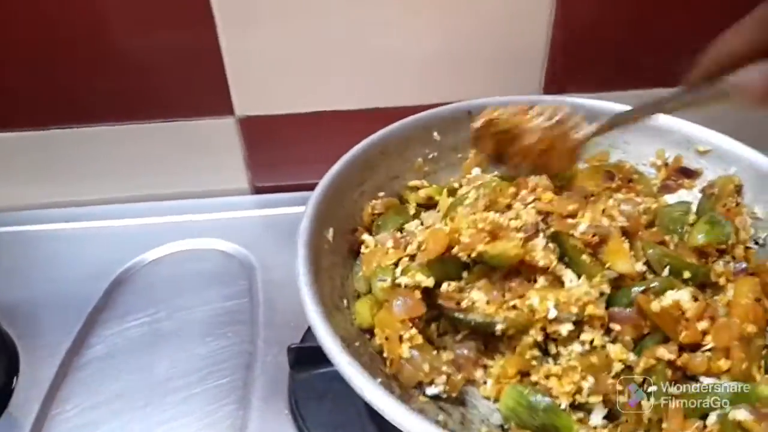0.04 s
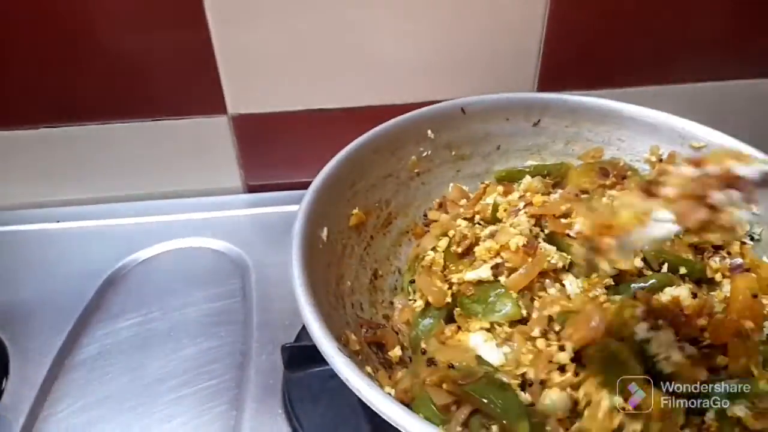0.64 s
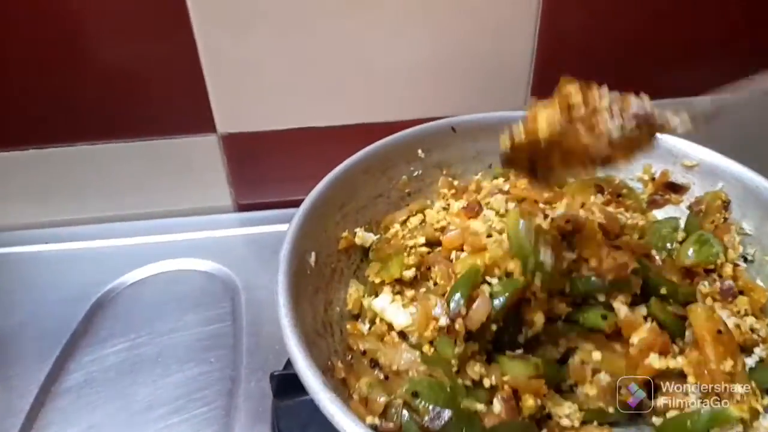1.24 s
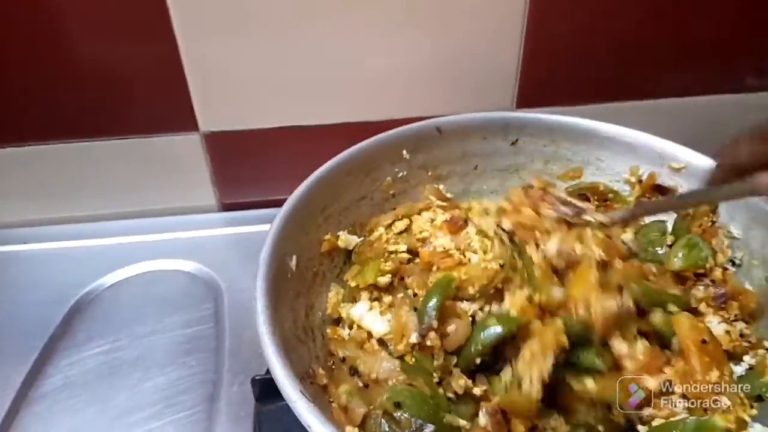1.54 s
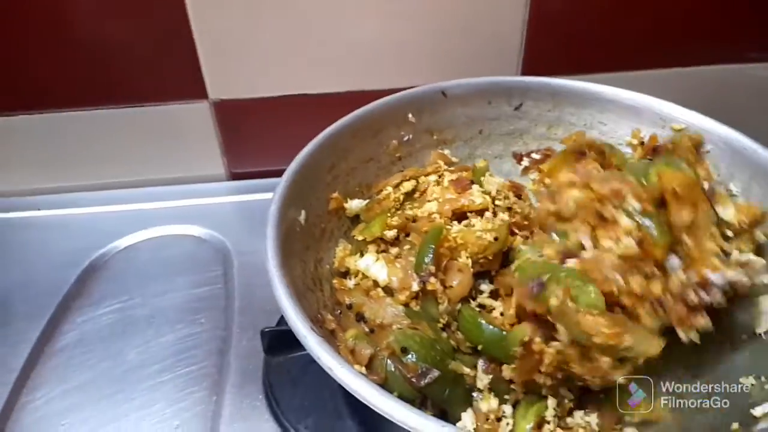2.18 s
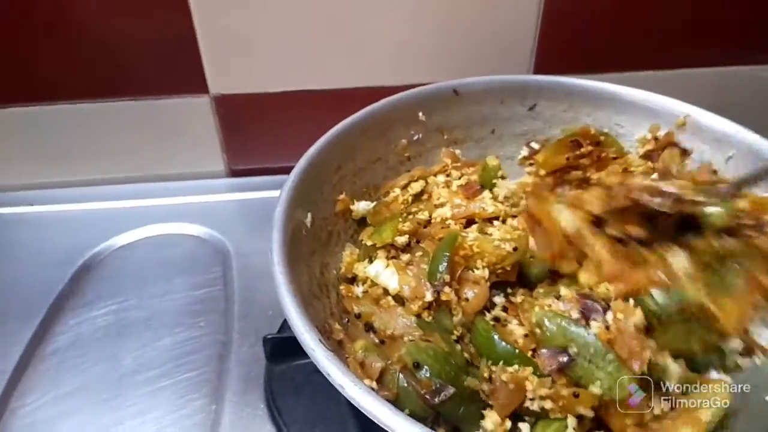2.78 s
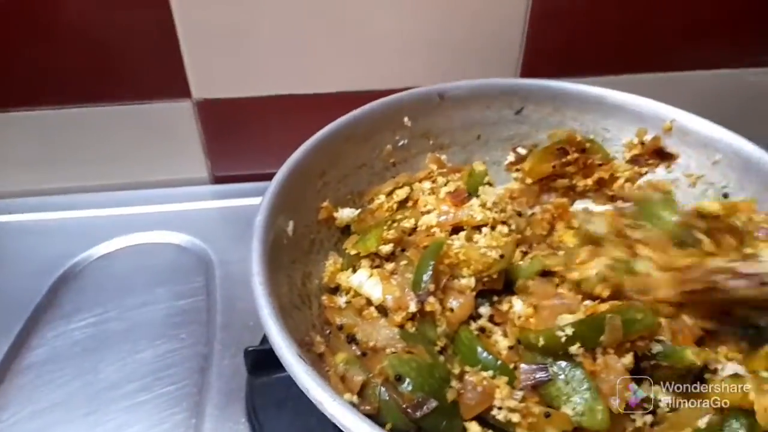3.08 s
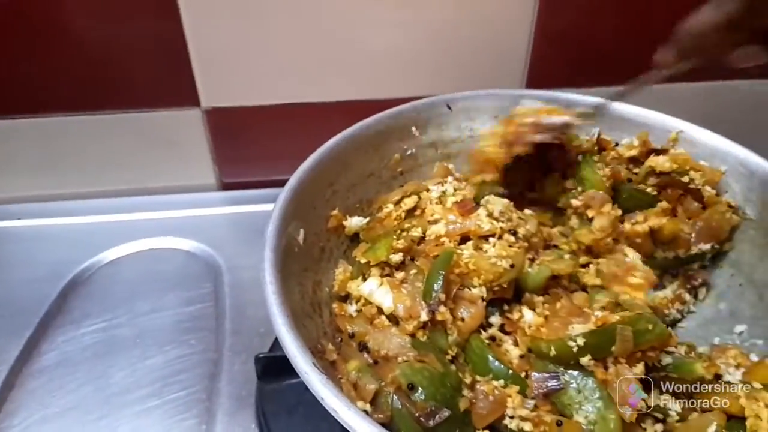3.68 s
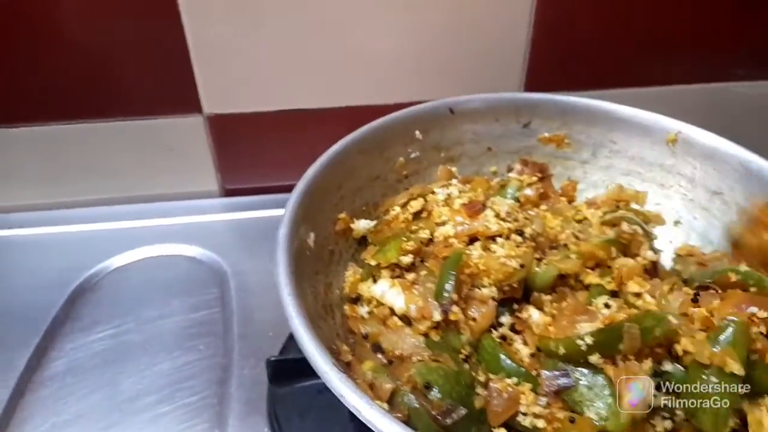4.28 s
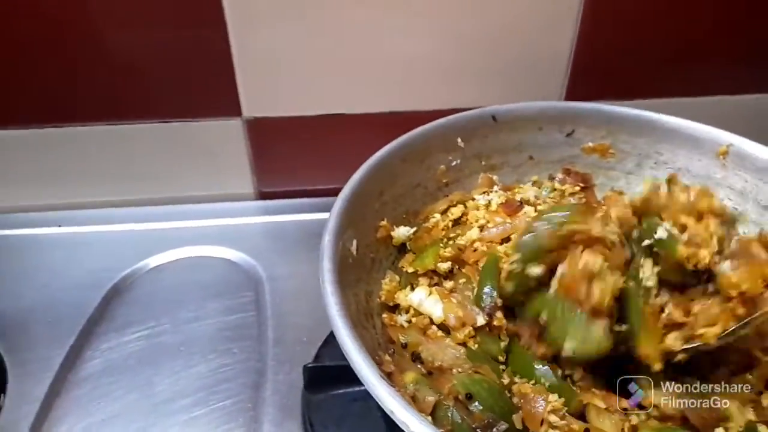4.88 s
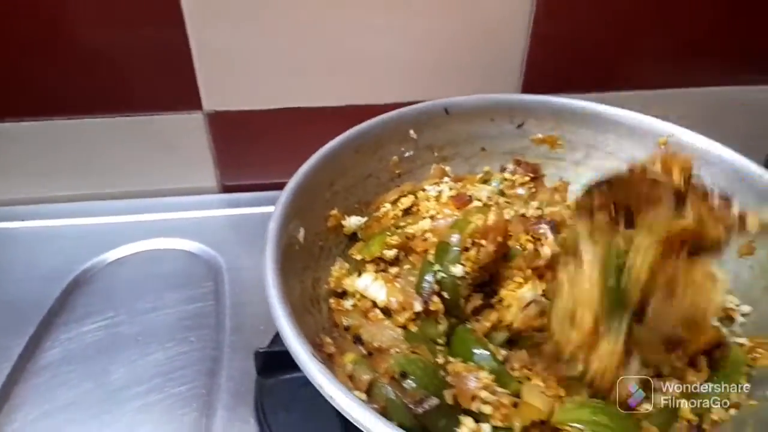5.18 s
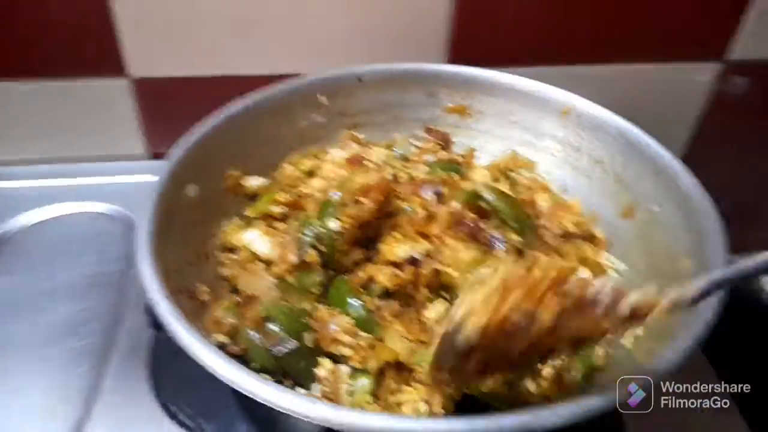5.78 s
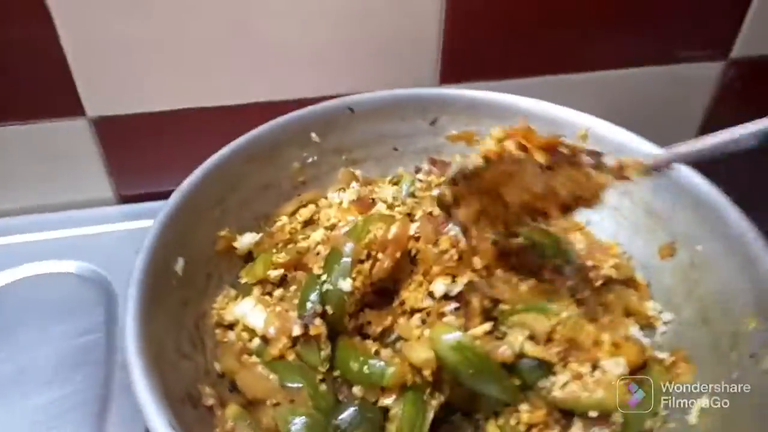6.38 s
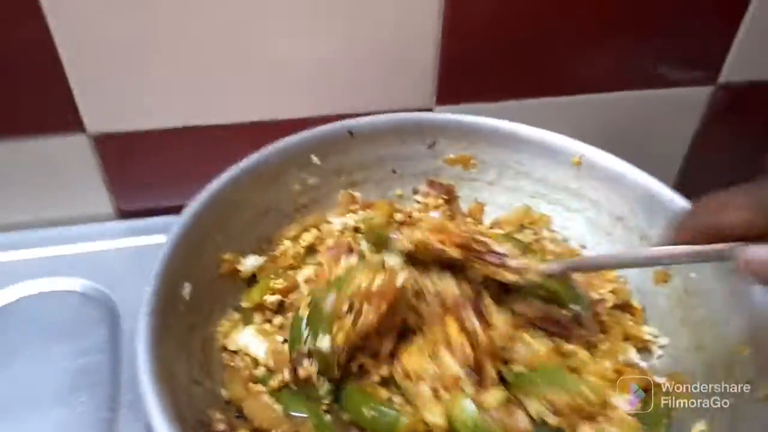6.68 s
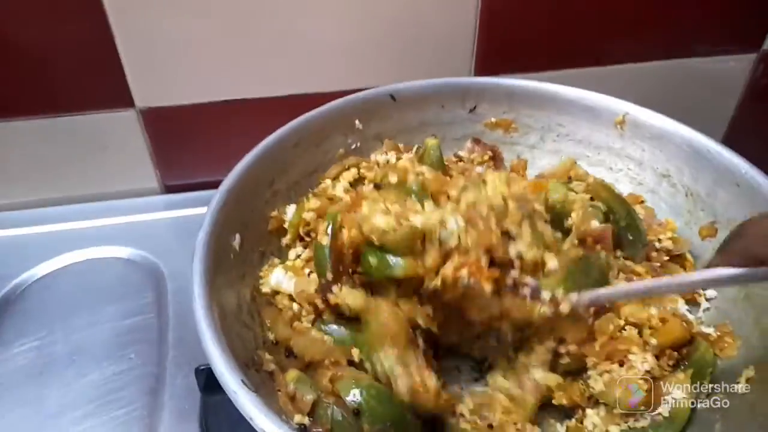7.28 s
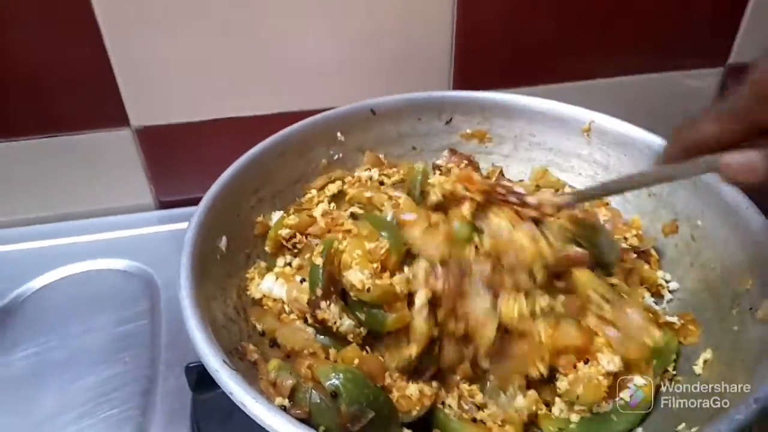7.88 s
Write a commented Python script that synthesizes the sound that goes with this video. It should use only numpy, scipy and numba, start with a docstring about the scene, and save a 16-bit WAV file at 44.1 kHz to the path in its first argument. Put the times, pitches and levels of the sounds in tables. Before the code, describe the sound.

Vegetables sizzle softly in a metal pan, with scattered pops of oil. A steel spoon turns them in short, irregular strokes, scraping and knocking against the food-damped metal, sometimes with a tiny squeak. The sizzle slowly declines but flares as wet food is turned over. The stove top thumps once early on, and the spoon clinks lightly before the last strokes. The microphone is close, in a tiled kitchen with a faint stove hum.

```python
"""In a tiled kitchen, close to a phone, a stove hums and vegetables sizzle and pop in a metal pan.
From a quarter of a second on, a steel spoon turns them: it lands, pushes and eases off. Its slips ring
the food-damped pan at a contact resonance that sinks as food piles up; grit rings the spoon, and at
times its edge squeaks. Near 1.8 s the stove top thumps once. The sizzle slowly declines, flaring when
wet food is turned over. Near 7 s the spoon clinks lightly, and the last strokes follow."""
import sys
import numpy as np
from scipy import signal
from scipy.fft import rfft, irfft, next_fast_len
from scipy.io import wavfile
from scipy.ndimage import uniform_filter1d
from numba import njit

SR = 44100
rng = np.random.default_rng(int(sys.argv[2]) if len(sys.argv) > 2 else 0)


def persist_wave(psi):
    """Save psi, clipped to +-1, as 16-bit WAV."""
    counts = np.round(np.clip(psi, -1, 1) * 32767).astype(np.int16)
    wavfile.write(sys.argv[1], SR, np.atleast_2d(counts).T)


N = 354563
TIME = np.arange(N) / SR
RING = TIME[:SR // 2]  # time axis of one decay [s]

# modes of the steel spoon: (frequency [Hz], relative level [dB], t60 [s])
SPOON_MODES = [(2784, -0.5, 0.072), (3255, -2, 0.12), (4277, -4.5, .11), (5450, 0.5, 0.063),
               (6370, -2.5, 0.089), (7590, -2, 0.089), (11400, -5, 0.075)]


def amp(db):
    """Decibels to amplitude ratio."""
    return 10 ** (np.asarray(db) / 20)


def unit(x):
    """Normalisation to rms 1."""
    return x / np.sqrt(np.mean(x ** 2))


def steady(x, size=1400):
    """Normalisation to a running rms of 1, which keeps the fast grain."""
    power = uniform_filter1d(np.mean(x ** 2, axis=0), size)
    return x / np.sqrt(uniform_filter1d(power, size // 2) + 1e-18)


def colour(x, points):
    """Spectral shaping by a curve of (frequency [Hz], gain [dB]) points."""
    hz, db = np.transpose(points)
    size = next_fast_len(x.shape[-1] + 4096)
    log_f = np.log(np.maximum(np.fft.rfftfreq(size, 1 / SR), 1))
    gain = amp(np.interp(log_f, np.log(hz), db, left=-80))
    return irfft(rfft(x, size) * gain, size)[..., :x.shape[-1]]


@njit
def svf(x, hz, width):
    """State-variable band-pass: a damped oscillator whose centre and width may move."""
    y, band, low = np.empty(len(x)), 0., 0.
    for i in range(len(x)):
        g, damping = np.tan(np.pi * hz[i] / SR), width[i] / hz[i]
        v = (band + g * (x[i] + 1e-18 - low)) / (1 + g * (g + damping))
        band, low, y[i] = 2 * v - band, low + 2 * g * v, damping * v
    return y


def resonate(x, hz, breadth):
    """Resonance with a relative bandwidth of breadth = 1 / Q."""
    hz = np.minimum(hz, .45 * SR) * np.ones(len(x))
    return svf(x, hz, hz * breadth)


def walk(rate):
    """Random modulation of rms 1, with `rate` new values a second."""
    size = int(SR / rate)
    steps = np.repeat(rng.standard_normal(N // size + 1), size)
    return unit(uniform_filter1d(steps, size)[:N])


def clicks(rate, spread_db):
    """Shot noise: a Poisson train of tiny impacts of uneven size."""
    impacts = (rng.random(N) < rate / SR) * rng.choice([-1, 1], N)
    return unit(impacts * amp(spread_db * np.minimum(rng.exponential(size=N), 4)))


def add(track, s, sound):
    """Superposition of a sound on a track at time s."""
    start = int(s * SR)
    track[start:start + len(sound)] += sound[:N - start]


def fade(t60):
    """Exponential decay by 60 dB in t60 seconds."""
    return np.exp(-np.log(1000) * RING / t60)


def ports(mid, side, wide_hz=700):
    """Spatial coherence: two nearby microphone ports share the bass and differ in the treble."""
    side = signal.sosfilt(signal.butter(1, wide_hz, "high", fs=SR, output="sos"), side)
    return np.array([mid + side, mid - side])


def response(early_db, early_t60, room_db, room_t60):
    """Impulse response: direct sound, early reflections off pan wall and tiles, then reverberation."""
    out = np.zeros((2, len(RING)))
    out[0, 0] = out[1, 3] = 1  # the direct sound reaches one port first
    for db, t60 in ((early_db, early_t60), (room_db, room_t60)):
        scatter = ports(*rng.standard_normal((2, len(RING))), wide_hz=495)
        out += amp(db) * scatter * fade(t60) / np.linalg.norm(fade(t60))
    # the reflections ripple the spectrum finely but leave its broad balance even
    spectrum = rfft(out)
    broad = uniform_filter1d(np.mean(np.abs(spectrum) ** 2, axis=0), size=90)
    taper = np.clip(4 * (1 - RING / RING[-1]) - 1, 0, 1)
    return irfft(spectrum / np.sqrt(broad), len(RING)) * taper


def ring(modes, db):
    """Free vibration: a sum of damped modes, each with its own phase at the two ports."""
    turns = rng.uniform(0.24, 1, len(modes))
    sides = np.array([[1], [-1]])
    out = np.zeros((2, len(RING)))
    for (hz, mode_db, t60), turn in zip(modes, turns):
        phase = 2 * np.pi * hz * RING + sides * turn * min(hz / 1200, 1)
        out += amp(mode_db) * fade(t60) * np.cos(phase)
    return amp(db) * out


def through(x, impulse):
    """Convolution of a force with a stereo impulse response."""
    return signal.oaconvolve(x[None], impulse, axes=1)[:, :N]


def stove():
    """A modulated hum over the kitchen's rumble; the sheet-metal top thumps once in its low modes."""
    # spectrum of the quiet kitchen: (frequency [Hz], relative level [dB])
    kitchen = [(27, -28), (42, -1), (60, -9.5), (90, 0.5), (120, -7), (148, -9.5), (190, -18.5),
               (260, -8.5), (370, -17), (460, -9), (620, -30.5), (1000, -11), (1500, -34)]
    hum = np.sin(2 * np.pi * np.cumsum(88.5 + 4 * walk(9.2)) / SR) * amp(-60 + 3.5 * walk(4.7))
    mid, side = colour(rng.standard_normal((2, N)), kitchen)
    rumble = unit(np.array([mid + 0.32 * side, mid - 0.63 * side])) * amp(-55 + 1.64 * walk(6.1))
    thump, thump_s = np.zeros(N), 1.776
    for hz, db, t60 in [(76.2, -29.5, 0.41), (92.3, -29.5, 0.6), (51.5, -34, 0.34)]:
        add(thump, thump_s, amp(db) * np.sin(2 * np.pi * hz * RING) * fade(t60) * (1 - fade(0.15)))
    return hum + rumble + thump


def evaporation():
    """Gains of sizzle and steam: a slow decline, to which the flares add in power."""
    # wet food meets hot metal: (peak time [s], rise [s], fall [s], sizzle level [dB], steam level [dB])
    flares = [(1.32, .12, 0.42, -49, -52.5), (1.64, 0.056, 0.058, -40.5, -49),
              (1.72, .04, 0.12, -52, -50.5), (2.82, 0.028, 0.087, -53, -64), (4.78, .06, .05, -42, -48.5),
              (5.11, 0.24, 0.082, -51, -61), (6.78, 0.093, .07, -49, -51), (7.62, 0.24, 0.1, -50, -55.5),
              (8.0, 0.11, 0.047, -48, -53)]
    sizzle = amp(-47 - 0.49 * TIME)
    steam = amp(-54.5 - 0.5 * TIME)
    for s, rise, fall, sizzle_db, steam_db in flares:
        flare = np.exp(-((TIME - s) / np.where(TIME < s, rise, fall)) ** 2 / 2)
        sizzle = np.hypot(sizzle, amp(sizzle_db) * flare)
        steam = np.hypot(steam, amp(steam_db) * flare)
    return sizzle, steam


def frying(air):
    """Shot noise of countless bursting bubbles, coarse and fine, under a hiss of steam."""
    # spectra of bubbles and steam: (frequency [Hz], relative level [dB])
    bubble_spectrum = [(500, -9), (850, -13.5), (1200, 1.5), (2000, -0.5), (3200, -4), (5000, -5.5),
                       (7200, -14.5), (8500, -18.5), (15000, -28.5)]
    steam_spectrum = [(4000, -12), (7000, 1), (8500, -7), (12000, 0), (15500, -3.5)]
    sizzle_gain, steam_gain = evaporation()
    crackle = unit(through(colour(clicks(rate=80, spread_db=2.5), bubble_spectrum), air))
    fine_bursts = ports(clicks(rate=4000, spread_db=1.5), clicks(rate=2800, spread_db=-1.5))
    fizz = unit(colour(fine_bursts, bubble_spectrum))
    hiss = ports(clicks(rate=6000, spread_db=1.0), clicks(rate=5500, spread_db=7))
    steam = unit(colour(hiss, steam_spectrum))
    bubbles = (amp(-7) * crackle + amp(-2.5) * fizz) * amp(1.07 * walk(25))
    return bubbles * sizzle_gain + steam * steam_gain


def pops_and_clink(air):
    """Impulse excitation: each pop or clink is a damped resonance with a snap of noise on top."""
    # pops of oil and wet food, and one light spoon clink near 7 s:
    # (time [s], relative level [dB], centre [Hz], relative snap level [dB])
    events = [(.1118, -29.5, 1920, -32), (0.693, -34.5, 1840, -28), (.7761, -35, 2200, 0),
              (1.226, -35, 4170, -26), (1.386, -27.5, 2830, -6), (1.4468, -31.5, 1260, -13),
              (2.1133, -36, 1480, -26), (2.6589, -33.5, 1210, -31), (3.116, -33.5, 1470, -25),
              (3.2045, -41, 1410, -18), (3.6103, -33.5, 1410, -26), (4.2434, -31, 1420, -26),
              (4.8966, -35.5, 1370, -26), (5.0818, -37, 3280, -3), (5.1144, -34.5, 1170, -6),
              (5.1556, -37, 1460, -22), (5.487, -35, 1360, -26), (6.8055, -38.5, 1160, -20),
              (7.0276, -40, 7540, -9)]
    out = np.zeros(N)
    no_bass = signal.butter(3, 900, "high", fs=SR, output="sos")
    for s, db, hz, snap_db in events:
        body = signal.sosfilt(no_bass, resonate(fade(.0001), hz, breadth=0.52))
        snap = resonate(rng.standard_normal(len(RING)) * fade(0.0074), hz=8300, breadth=2.2)
        snap = amp(snap_db + 3.5) * snap / np.abs(snap).max()
        add(out, s, amp(db) * (body / np.abs(body).max() + snap))
    return amp(8.0) * through(out, air)


def squeaks():
    """Self-excited vibration: friction feeds one mode unevenly for a moment, then the food damps it."""
    # the dragged edge locks onto a mode: (start [s], end [s], frequency [Hz], median level [dB])
    lock_ins = [(0.241, .266, 798, -42.5), (2.218, 2.277, 7650, -43), (2.22, 2.311, 468, -47),
                (2.235, 2.253, 2850, -38), (3.246, 3.294, 2720, -51.5), (3.9, 4.053, 1507, -46),
                (3.81, 4.0, 3245, -53), (3.95, 4.022, 5370, -45.5), (3.978, 4.01, 4240, -47),
                (4.005, 4.04, 3252, -43.5), (6.15, 6.238, 456.4, -48.5), (7.232, 7.265, 1314, -38),
                (7.28, 7.39, 461.4, -47.5)]
    out = np.zeros((2, N))
    for s, end, hz, db in lock_ins:
        held = np.minimum(RING / 0.0042, 1) * np.exp(-np.maximum(RING + s - end, 0) / 0.014)
        phase = 2 * np.pi * np.cumsum(hz + 28 * walk(259)[:len(RING)]) / SR
        # the ports hear each mode a little out of step
        for port, turn in zip(out, (0, rng.uniform(-0.8, 1.9))):
            add(port, s, np.sqrt(2) * amp(db) * held * np.sin(phase + turn))
    return out * amp(5.3 * walk(200))


def strokes():
    """Contact resonance and scraping gains: sound swells with the push; piled food lowers the pitch."""
    # the spoon lands, drags up to its hardest push, holds it and eases off; levels are those of the push
    # (landing [s], drag [s], hold [s], landing resonance [Hz], push resonance [Hz], rasp level [dB],
    #  rasp swell [dB], pan base level [dB], crunch level [dB], grit level [dB], grit swell [dB],
    #  rasp release [dB/s], grit release [dB/s])
    gestures = [(0.242, 0.077, .02, 600, 513, -44, 21, -33, -42.5, -66, 6, 205, 200),
                (0.36, 0.009, 0.004, 560, 565, -28.5, -10, -34.5, -33.5, -41, 0, 182, 73),
                (0.978, 0.0028, .004, 1130, 940, -24, -6, -33.5, -34, -43, 0, 132, 102),
                (2.189, .048, 0.024, 1380, 1490, -15, 20, -39.5, -31, -29.5, 12, 227, 270),
                (3.233, 0.016, 0.025, 660, 690, -33.5, -2, -35.5, -41, -40.5, 11, 224, 340),
                (3.756, .25, .012, 530, 930, -30, 6.5, -34, -40.5, -30, 30, 304, 500),
                (4.339, 0.063, 0.0077, 507, 494, -42.5, 5, -38.5, -47.5, -43, 27, 172, 73),
                (4.457, 0.094, .008, 570, 845, -47.5, 9, -47.5, -40, -47, 12, 256, 450),
                (5.972, 0.028, 0.043, 970, 1060, -35, 6, -41.5, -38, -43, -4, 202, 150),
                (6.053, 0.017, 0.046, 1230, 1290, -28, 0, -49, -46, -51, 0, 159, 120),
                (6.154, 0.018, 0.013, 597, 503, -40.5, 3, -40.5, -45, -48, 7, 235, 242),
                (7.235, .032, 0.013, 1000, 880, -25, 13, -42, -35.5, -41, 2, 229, 126),
                (7.471, .035, .015, 460, 490, -44, 12, -43, -70, -75, 0, 240, 100)]
    landing_s, air_gap_s, base_linger_s = 0.0027, .02, 0.034
    sink_octaves_per_s, buried_hz = 8.5, 493.0
    bite = 0.23  # share of the drag before the edge bites again after the spoon rebounds from landing
    age = TIME[:SR]
    hz, gains = np.full(N, buried_hz), np.zeros((4, N))
    for (s, drag, hold, land_hz, push_hz, rasp_db, swell_db, base_db, crunch_db,
         grit_db, grit_swell_db, release, grit_release) in gestures:
        to_go = np.clip(1 - age / drag, 0, 1)
        easing = np.maximum(age - drag - hold, 0)
        base_easing = np.maximum(easing - base_linger_s, 0)
        biting = np.minimum(age / (bite * drag), 1) ** 3
        rasp = amp(rasp_db - swell_db * to_go - release * easing)
        # pan base and crunch follow only a share of the rasp's swell and release
        base = amp(base_db - 0.4 * swell_db * to_go - 0.6 * release * base_easing)
        crunch = amp(crunch_db - 0.45 * swell_db * to_go - 0.64 * release * easing)
        grit = amp(grit_db - grit_swell_db * to_go - grit_release * easing) * biting
        for gain, shape in zip(gains, (rasp, base, crunch, grit)):
            add(gain, s, shape * np.minimum(age / landing_s, 1))
        lifted = int((s - air_gap_s) * SR)
        since = TIME[lifted:] - s
        sunk = 2 ** (-sink_octaves_per_s * np.maximum(since - drag, 0))
        hz[lifted:] = np.maximum(np.interp(since, [0, drag], [land_hz, push_hz]) * sunk, buried_hz)
    return hz, gains


def scrapes(pan, spoon):
    """Stick-slip friction: the harder the edge presses, the nearer its rasp comes to a squeal."""
    # spectra of pan base, crushed food and steel grit: (frequency [Hz], relative level [dB])
    base_spectrum = [(45, -9), (105, -13), (150, 1.5), (195, -3), (255, 4.5), (315, -4), (375, -7),
                     (470, -2), (580, -20), (750, -28)]
    crunch_spectrum = [(700, -5), (1450, 10.5), (1900, 6), (2600, 3.5), (4200, -3.5), (5400, -3),
                       (7200, -2), (8500, -12), (15000, -48)]
    grit_spectrum = [(3000, -16), (6500, -10.5), (8200, -11), (10000, -6), (12000, -4), (15500, -11.5)]
    hz, (rasp_gain, base_gain, crunch_gain, grit_gain) = strokes()
    pressure = np.clip((20 * np.log10(rasp_gain + 1e-18) + 36.4) / 12, 0, 1)
    breadth = 0.96 * (1 - pressure) + 0.23 * pressure
    # the contact point hops about, so its resonance wavers by a tenth of an octave
    hz = hz * 2 ** (.1 * walk(110))
    judder = amp(3.16 * walk(150))
    slips = clicks(rate=1100, spread_db=2.5) * judder
    # under load the slips fall into a nearly regular train
    slip_count = np.floor(np.cumsum(150 * amp(1.2 * walk(90))) / SR)
    chatter = unit(np.diff(slip_count, prepend=0))
    drive = slips + 0.73 * pressure * chatter
    rasp = through(resonate(resonate(drive, hz, breadth), hz, 1.76 * breadth), pan)
    base = through(colour(slips, base_spectrum), pan)
    crunch = through(colour(clicks(rate=1000, spread_db=3.0) * judder, crunch_spectrum), spoon)
    grit = through(colour(clicks(rate=1600, spread_db=-1) * judder, grit_spectrum), spoon)
    body = steady(rasp, size=900) * rasp_gain + steady(base, size=900) * np.hypot(base_gain, nudges())
    spoon_ring = through(slips, ring(SPOON_MODES, db=0))
    ring_gain = amp(-11.5) * np.hypot(grit_gain, crunch_gain)
    return body + steady(crunch) * crunch_gain + steady(grit) * grit_gain + steady(spoon_ring) * ring_gain


def knocks(pan, spoon, near):
    """Impact excitation: each blow thuds at the contact resonance, rings the pan and ticks the spoon."""
    # spoon on pan: (time [s], resonance [Hz], relative thud level [dB], relative tick level [dB])
    blows = [(.279, 2530, -29.5, -45), (.312, 293, -21, -42), (.363, 2770, -18.5, -28),
             (.363, 4240, -19.5, -27), (.369, 297, -14.5, -31), (.384, 298, -13.5, -44),
             (.981, 1140, -10.5, -22), (0.982, 1760, -17, -22), (2.196, 2500, -23, -35),
             (3.236, 780, -20.5, -43), (3.759, 900, -23.5, -26), (4.333, 245, -34, -27),
             (5.972, 2455, -10, -9), (6.056, 1380, -21, -39), (6.068, 1320, -19, -34),
             (6.084, 1260, -18.5, -30), (7.247, 1330, -21, -36), (7.488, 324, -34, -47)]
    # spectrum of the tick: (frequency [Hz], relative level [dB])
    tick_spectrum = [(900, 4), (2000, 14), (2800, -5), (4000, 0), (6500, 6), (8500, 1), (12000, 5),
                     (15500, -4)]
    push, tick = np.zeros((2, N))
    for s, hz, thud_db, tick_db in blows:
        add(push, s, amp(thud_db) * np.sin(2 * np.pi * hz * RING) * fade(0.016 + 7 / hz))
        add(tick, s, amp(tick_db) * rng.standard_normal(len(RING)) * fade(0.0024))
    # the blows carry no deep bass
    push = signal.sosfilt(signal.butter(3, 190, "high", fs=SR, output="sos"), push)
    thud = amp(-3.5) * through(push, near + pan)
    return thud + amp(2) * through(colour(tick, tick_spectrum), near + spoon)


def nudges():
    """Transient gain of the pan base: a quick rise, then an exponential decay."""
    # pushed food shifts the pan on its stand: (time [s], level [dB])
    shifts = [(.482, -48), (1.06, -31), (1.185, -49), (2.135, -47), (2.17, -44), (3.158, -49.5),
              (4.335, -33.5), (4.925, -48.5), (5.983, -31.5), (6.292, -39.5), (7.21, -49), (7.49, -35.5)]
    shape = np.minimum(RING / 0.0069, 1) * fade(t60=0.32)
    gain = np.zeros(N)
    for s, db in shifts:
        add(gain, s, amp(db) * shape / shape.max())
    return gain


def scene():
    """Superposition of spoon, food and stove, with the responses of pan, spoon and kitchen."""
    # modes of the pan full of food: (frequency [Hz], relative level [dB], t60 [s])
    pan_modes = [(145, -11, 0.39), (263.7, -1, 0.18), (311.8, 7, 0.22), (459, 0.5, 0.19), (559, 4, 0.11),
                 (636, 0, 0.15), (788, -4, 0.32), (955, -1.5, 0.38), (1005, -3.5, 0.2), (1164, 8.5, 0.068),
                 (1332, -1.5, 0.094), (1430, 15, 0.033), (1465, -29, 0.14), (1440, -12, 0.45),
                 (2360, -1, 0.32), (2635, 6, 0.099)]
    pan = response(early_db=-1.5, early_t60=0.019, room_db=3, room_t60=0.36)
    pan += ring(pan_modes, db=-48.5)
    spoon = response(early_db=15, early_t60=0.049, room_db=8.0, room_t60=0.56)
    spoon += ring(SPOON_MODES, db=-47.0)
    # the food's surface faces the phone, so its sound arrives almost dry
    near = response(early_db=-1, early_t60=.008, room_db=-8, room_t60=.22)
    # crackle, pops and the clink also ring the pan faintly
    in_pan = near + ring(pan_modes, db=-55.5)
    stirring = scrapes(pan, spoon) + squeaks() + knocks(pan, spoon, near)
    return stirring + frying(in_pan) + pops_and_clink(in_pan) + stove()


def record(dry):
    """Saturation and band limiting: the phone rounds off the sharpest peaks and cuts the top."""
    ceiling, top_hz = .68, 15800
    rounded = dry / (1 + (dry / ceiling) ** 6) ** (1 / 6)
    return signal.sosfilt(signal.ellip(10, .2, 70, top_hz, fs=SR, output="sos"), rounded)


dry = scene()
out = record(dry)
persist_wave(out)
```